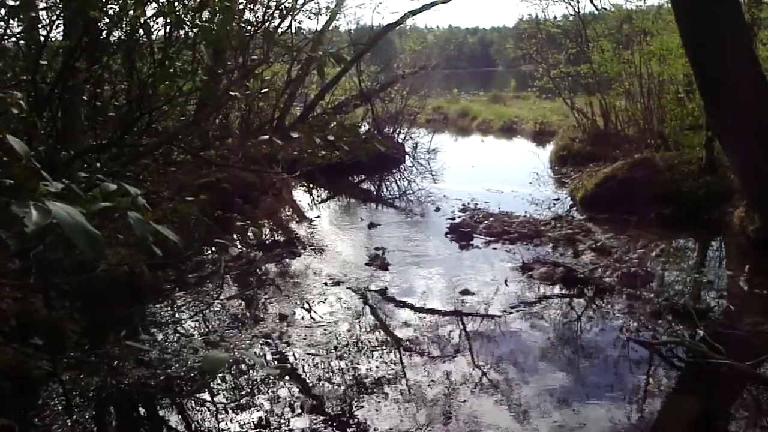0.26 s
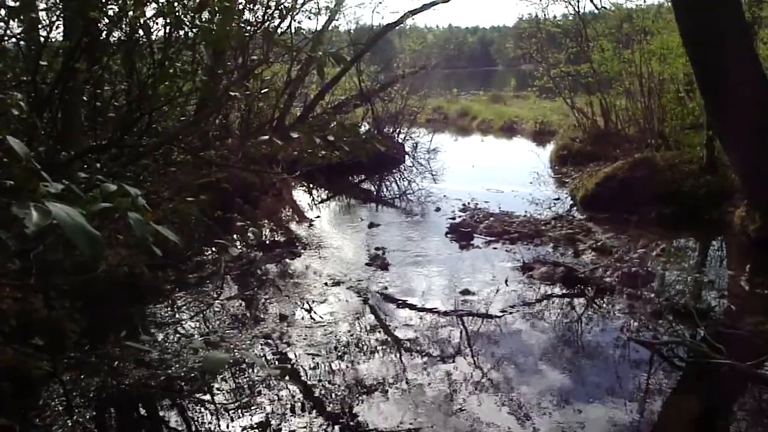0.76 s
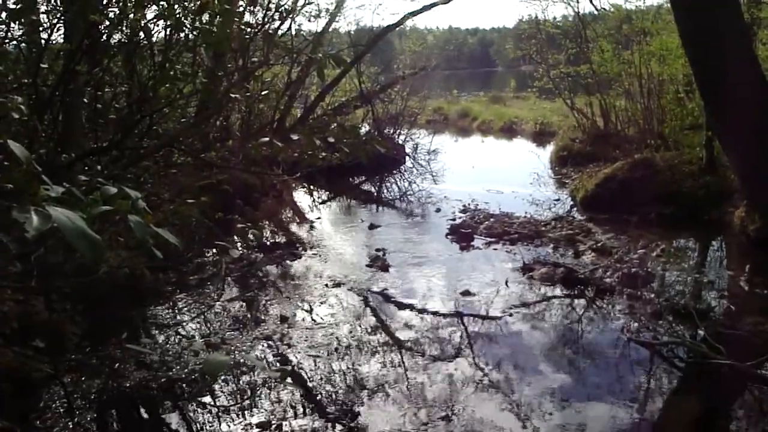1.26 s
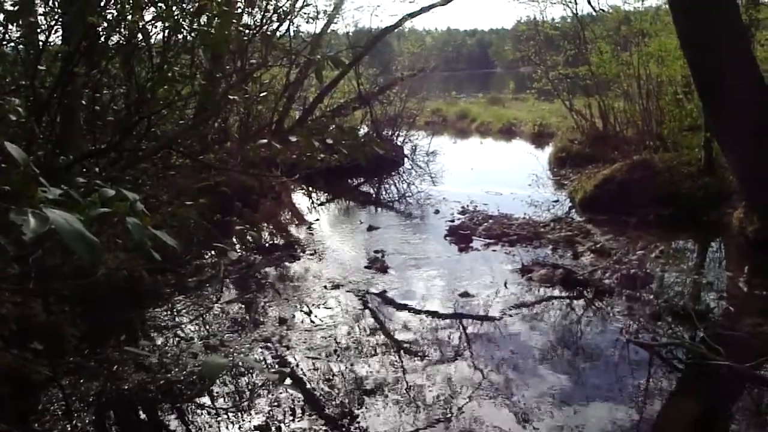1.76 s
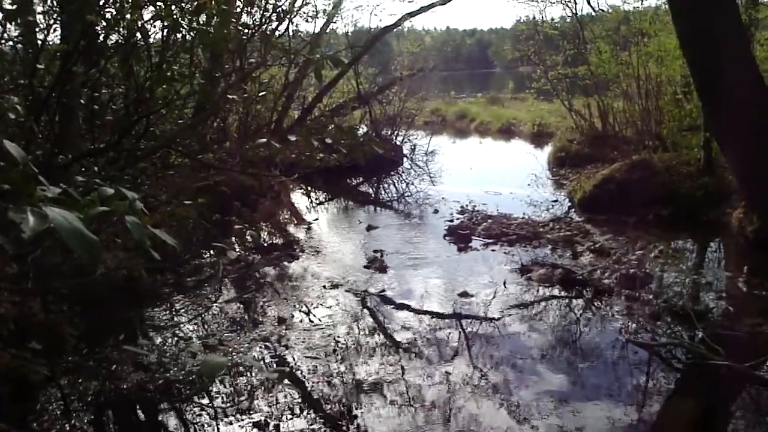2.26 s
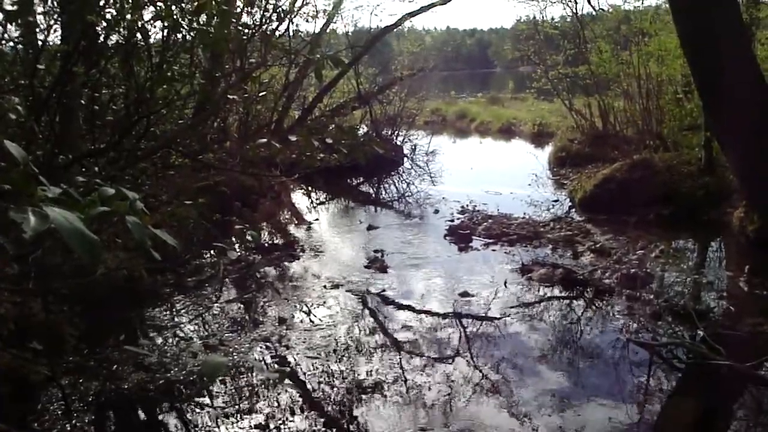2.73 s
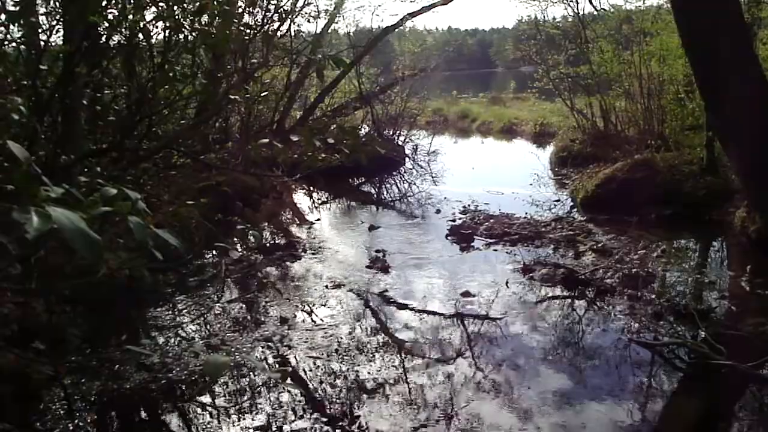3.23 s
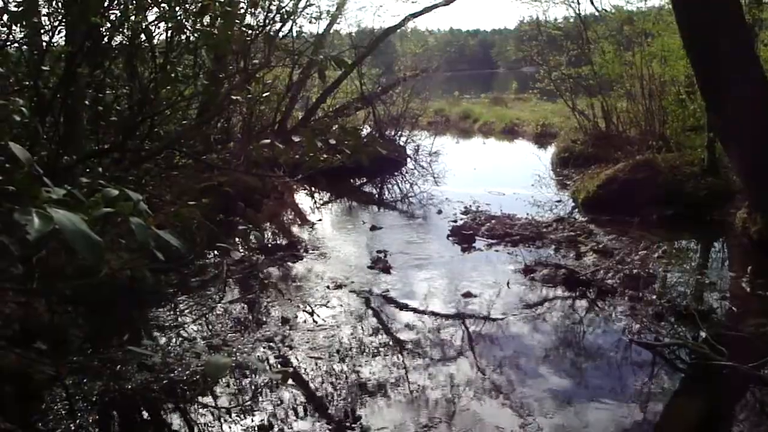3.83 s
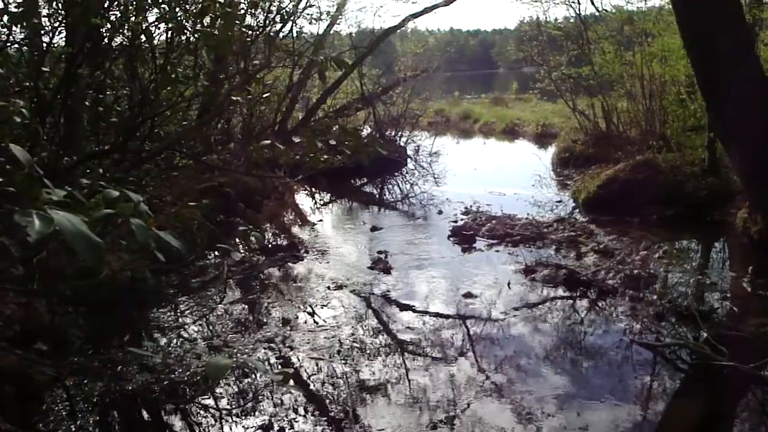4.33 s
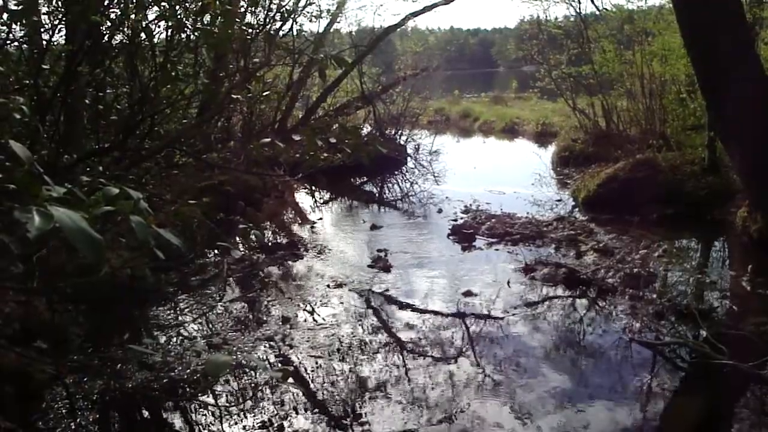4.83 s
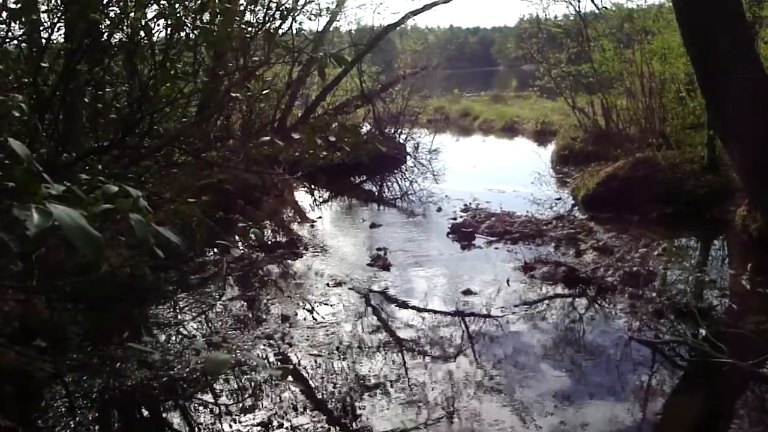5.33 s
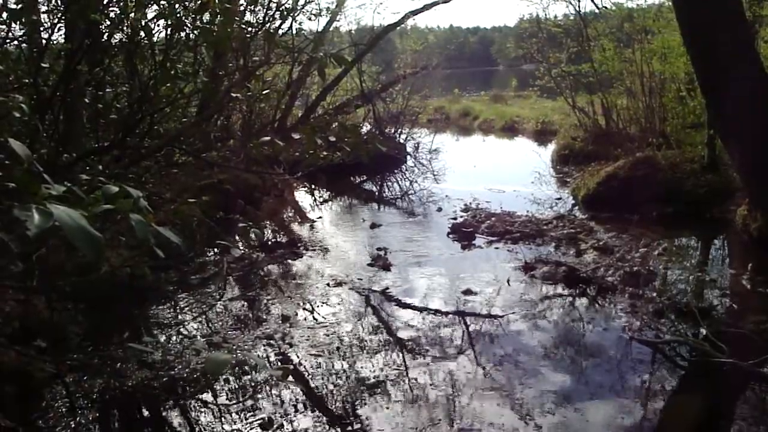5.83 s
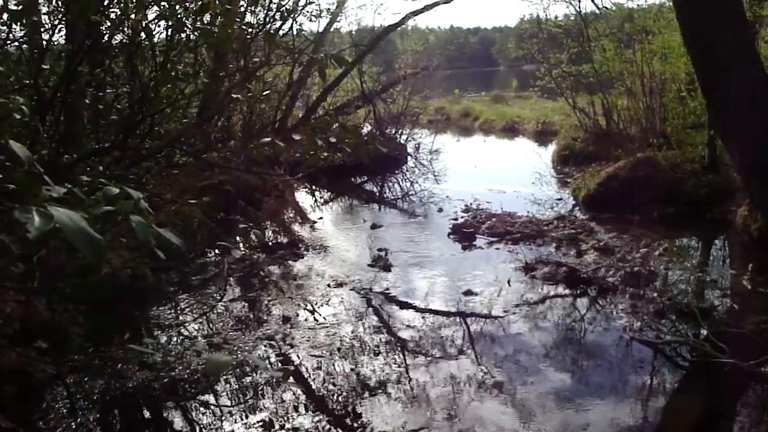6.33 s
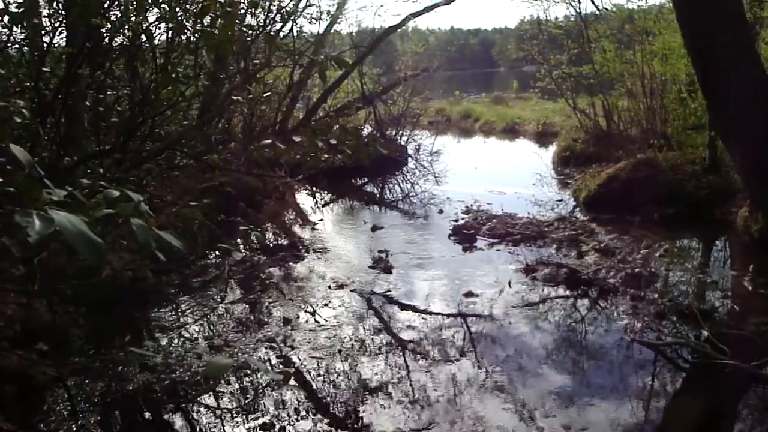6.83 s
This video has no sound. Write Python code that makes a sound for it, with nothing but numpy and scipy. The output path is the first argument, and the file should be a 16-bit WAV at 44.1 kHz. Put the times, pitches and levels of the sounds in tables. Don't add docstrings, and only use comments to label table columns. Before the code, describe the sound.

Steady overlapping toad trills by a pond, with soft breeze and hiss, rapid faint mechanical ticking, and thin bird calls across the water.

```python
import sys
import numpy as np
from scipy import signal
from scipy.fft import rfft, irfft
from scipy.io import wavfile
from scipy.ndimage import uniform_filter1d

SR = 44100
rng = np.random.default_rng(int(sys.argv[2]) if len(sys.argv) > 2 else 0)


def nominal_scale(level):
    x = np.asarray(level, float) / 20
    return 10 ** x


def generate_wav(signal):
    frames = np.transpose(np.atleast_2d(signal))
    scaled = np.clip(frames, -1, 1) * 32767
    pcm = np.round(scaled).astype(np.int16)
    wavfile.write(sys.argv[1], SR, pcm)


N = 312669
T = np.arange(N) / SR


def unit(x):
    return x / np.sqrt(np.mean(x ** 2))


def walk(rate):
    hold = int(SR / rate)
    levels = np.repeat(rng.standard_normal(N // hold + 1), hold)
    slewed = uniform_filter1d(uniform_filter1d(levels, hold), hold)
    return unit(slewed[:N])


def turns(hz):
    return np.cumsum(hz) / SR


def coloured(hz, db):
    log_hz = np.log(np.arange(1, N // 2 + 2) * SR / N)
    return irfft(rfft(rng.standard_normal(N)) * nominal_scale(np.interp(log_hz, np.log(hz), db)), N)


def wood(x, wet_db, t60, stir):
    gap_s = 0.008
    t = T[:SR]
    tail = rng.standard_normal(SR) * np.exp(-np.log(1000) * t / t60) * (t > gap_s)
    scatter = signal.fftconvolve(x * walk(stir), tail / np.linalg.norm(tail))[:N]
    return x + nominal_scale(wet_db) * scatter


def background():
    # (frequency [Hz], level [dB per Hz])
    air = np.array([(45, -20), (65, -3.5), (108, 0), (254, -1), (416, -1), (1080, -6), (1300, -6.5)])
    # (frequency [Hz], level [dB per Hz])
    hiss = np.array([(2050, -0.5), (3000, -3), (3420, -3), (8000, -9.5), (8700, -9), (10700, -12)])
    split_hz = 1700
    low = coloured([15, *air[:, 0], split_hz, split_hz + 1], [-30, *air[:, 1], air[-1, 1], -90])
    high = coloured([split_hz, split_hz + 1, *hiss[:, 0]], [-90, hiss[0, 1], *hiss[:, 1]])
    air_db = -55 + 0.5 * walk(2.83)
    hiss_db = -57.5 + 0.3 * walk(6)
    return nominal_scale(air_db) * unit(low) + nominal_scale(hiss_db) * unit(high)


def toad(hz, rate, tune_hz, sweep_hz, duty):
    rate_drift, slip_turns, wobble_hz = 0.026, 0.16, 5.5
    octave_db, fade_db, attack = -29.5, 0.5, 0.7
    count = turns(rate * (1 + rate_drift * walk(2.5))) + rng.random()
    opening = np.clip(count % 1 / np.clip(duty, 0.2, 1), 0, 1)
    slip = np.cumsum(slip_turns * rng.standard_normal(400))[count.astype(int)]
    bend = duty / rate * (tune_hz * opening + sweep_hz * (opening ** 2 - opening))
    phase = 2 * np.pi * (turns(hz + wobble_hz * walk(5)) + bend + slip)
    tone = np.sin(phase) + nominal_scale(octave_db) * np.sin(2 * phase)
    pulses = np.sin(np.pi * opening ** attack) ** 1.2
    return unit(pulses * tone) * nominal_scale(fade_db * walk(3.89))


def chorus():
    # (group, tone [Hz], pulse rate [1/s])
    toads = [(0, 1518, 39.0), (0, 1470, 26.0), (1, 1578, 33.0), (1, 1640, 26.9), (1, 1666, 38.0),
             (1, 1612, 24.0), (1, 1722, 27.0), (2, 1838, 38.5), (2, 1772, 26.0), (2, 1876, 36.0),
             (2, 1922, 31.0)]
    # (share [dB], sac tuning above the tone [Hz], upward sweep in a pulse [Hz],
    # open part of the cycle [0-1])
    styles = [(0, -16, 30, .8), (-6, -10, 30, .75), (-7, -3, 30, .8), (-1, -2, 30, .7), (0, 12, 30, .75),
              (-4, -4, 30, .8), (-8, -6, 20, .85), (0, -3, 50, .72), (-.5, 8, 20, .85), (-4, -3, 10, .9),
              (-12, 0, 30, .75)]
    # (level [dB], main callers stop [s], level of those left [dB])
    group_levels = [
        (-52.5, 5.05, -79),
        (-47.5, 5.6, -57),
        (-50, 7.1, -50.5),
    ]
    # (time [s], gain [dB])
    swells = [(.09, 0), (.45, 2), (.85, 0.5), (1.48, 3.5), (1.65, 5), (3.4, 2.5), (3.95, 3), (4.6, 4.5),
              (4.96, 3.5), (5.31, 2.5), (5.5, 1.5)]
    stop_fade_s, swell_s = 0.084, 0.027

    groups = np.zeros((3, N))
    for (group, hz, rate), (db, tune_hz, sweep_hz, duty) in zip(toads, styles):
        groups[group] += nominal_scale(db) * toad(hz, rate, tune_hz, sweep_hz, duty)
    out = 0
    for voices, (db, stop_s, left_db) in zip(groups, group_levels):
        heard = wood(voices, wet_db=-4, t60=1, stir=6)
        steady = heard / np.sqrt(uniform_filter1d(heard ** 2, size=SR // 3) + 1e-3)
        out = out + steady * nominal_scale(np.interp(T, [stop_s, stop_s + stop_fade_s], [db, left_db]))
    swell_db = sum(db * np.clip(1 - abs(T - s) / swell_s, 0, 1) for s, db in swells)
    return out * nominal_scale(swell_db)


def lens():
    # (frequency [Hz], ring T60 [s], share in a big step [dB])
    housing = [(4450, .008, -10), (5660, .012, -3), (5850, .011, -1), (6150, .009, 0), (6700, .006, -4),
               (7300, .007, -7), (8720, .014, -14), (9400, .012, -17)]
    tick_colour_db = [-8, -12, -3.5, -15, 2, -3, -5.5, -8.5]
    # (time [s], peak level [dB])
    motor_steps = [(0.4329, -41), (0.5162, -51), (0.5661, -40.5), (0.5995, -39), (0.6325, -42),
                   (1.3673, -45), (1.5165, -48), (1.5339, -47), (1.5675, -38.5), (2.1011, -43),
                   (2.1345, -54), (2.2677, -39), (2.3015, -40), (2.335, -37.5), (2.4843, -41),
                   (2.5017, -45), (4.337, -38.5)]
    field_hz, first_field_s = 59.94, 0.0159
    fade_from_s, fade_db_per_s = 4.4, 16

    ticks, steps = np.zeros((2, N))
    at = np.arange(first_field_s, N / SR - 0.01, 1 / field_hz)
    fade_db = fade_db_per_s * np.maximum(at - fade_from_s, 0)
    ticks[(at * SR).astype(int)] = nominal_scale(-54.5 - fade_db + 2.1 * rng.standard_normal(len(at)))
    for s, db in motor_steps:
        steps[int(s * SR)] = nominal_scale(db - 4.5)
    hz, t60, step_db = np.transpose(housing)
    t = T[:SR // 20, None]
    onset = 1 - np.exp(-t / 0.00042)
    rings = onset * np.exp(-np.log(1000) * t / t60) * np.sin(2 * np.pi * hz * t)
    field_ticks = signal.oaconvolve(ticks, rings @ nominal_scale(tick_colour_db))
    big_steps = signal.oaconvolve(steps, rings @ nominal_scale(step_db))
    return (field_ticks + big_steps)[:N]


def whistles(songs):
    edge_s, flutter_db = 0.008, 1.2
    out = np.zeros(N)
    for s, hz, db in map(np.transpose, songs):
        span = slice(int(s[0] * SR), int(s[-1] * SR))
        t = T[span]
        edge = np.clip(np.minimum(t - s[0], s[-1] - t) / edge_s, 0, 1)
        out[span] += edge * nominal_scale(np.interp(t, s, db)) * np.sin(2 * np.pi * turns(np.interp(t, s, hz)))
    return np.sqrt(2) * out * nominal_scale(flutter_db * walk(45))


def two_voices(start, length, slide_hz, upper_db, lower_db):
    start_hz, slide_s, fall_to_hook_hz = 3715, 0.062, 480
    hook_at_s, hook_hz_per_s = 0.285, 9000
    beak_hz, beak_width_hz, beak_db = 3380, 42, 8.5
    lower_ratio, lower_floor_hz, lower_onset_db = 0.75, 2545, 4

    t = T[:int(length * SR)]
    slide = slide_hz * (1 - np.exp(-t / slide_s))
    sag = (fall_to_hook_hz - slide_hz) * t / hook_at_s
    hz = start_hz - slide - sag
    hook_hz = hook_hz_per_s * np.maximum(t - hook_at_s, 0)
    db = upper_db + beak_db * np.exp(-((hz - beak_hz) / beak_width_hz) ** 2)
    upper = np.transpose([start + t, hz - hook_hz, db])
    low_hz = np.maximum(lower_ratio * hz, lower_floor_hz)
    lower = np.transpose([start + t, low_hz, lower_db + lower_onset_db * np.exp(-t / slide_s)])
    return [upper, lower[hook_hz == 0]]


def buzz(start, length, first_hz, last_hz, db):
    slur_rate, scatter_hz, rough_db = 170, 240, 2.2
    edge_s, fade_s = 0.03, 0.097
    count = turns(slur_rate * (1 + 0.28 * np.tanh(walk(50))))
    cycle = count % 1
    pitch_chance, strength_chance = rng.standard_normal((2000, 2))[count.astype(int)].T
    path_hz = np.interp(T, [start, start + length], [first_hz, last_hz])
    pitch = path_hz + scatter_hz * (pitch_chance + 1 - 2 * cycle)
    edge = np.clip(np.minimum((T - start) / edge_s, (start + length - T) / fade_s), 0, 1)
    slur = np.sin(np.pi * cycle) * nominal_scale(rough_db * strength_chance) * np.sin(2 * np.pi * turns(pitch))
    return unit(slur) * edge * nominal_scale(db)


def birds():
    # (start [s], length [s], first pitch [Hz], last pitch [Hz], level [dB])
    short_notes = [(1.027, .022, 5760, 5760, -66), (1.052, 0.022, 5760, 5760, -62),
                   (1.26, .08, 3350, 3350, -69), (1.98, 0.098, 4250, 4130, -69),
                   (2.071, 0.056, 4120, 4100, -63), (2.346, .055, 5750, 5720, -66),
                   (2.36, 0.052, 6720, 6720, -70), (2.55, 0.038, 4200, 4020, -64),
                   (2.59, .035, 4300, 4100, -67), (2.735, .04, 6380, 6400, -64),
                   (2.772, .045, 5900, 5900, -69), (4.328, .02, 4420, 4400, -64),
                   (4.345, .055, 4200, 4180, -70), (4.52, .07, 2500, 2510, -71),
                   (5.223, .11, 3890, 3900, -65), (5.48, 0.13, 2380, 2480, -61.5),
                   (5.541, 0.17, 3400, 3350, -70)]
    # (start [s], length [s], opening slide [Hz], upper voice [dB], lower voice [dB])
    falling = [
        (1.068, .11, 420, -66.5, -90),
        (2.08, .2, 370, -71, -90),
        (4.095, .315, 215, -61.5, -67),
        (5.113, .325, 215, -61.5, -68),
        (5.745, .2, 365, -64, -80),
    ]
    # (start [s], length [s], first pitch [Hz], last pitch [Hz], level [dB])
    phrases = [
        (2.18, .37, 5200, 5800, -67.5),
        (2.45, .2, 5800, 5550, -63),
        (2.58, .44, 5700, 6650, -64.5),
        (2.39, .15, 5200, 4100, -64),
        (2.5, .16, 5200, 4100, -64),
        (2.6, .3, 5300, 5750, -67),
    ]
    stir = 260
    notes = [[(s, a, db), (s + length, b, db)] for s, length, a, b, db in short_notes]
    calls = [voice for row in falling for voice in two_voices(*row)]
    across_water = wood(whistles(calls + notes), wet_db=-7.5, t60=1.5, stir=stir)
    deep_in_wood = wood(sum(buzz(*row) for row in phrases), wet_db=3, t60=0.6, stir=stir)
    return across_water + deep_in_wood * nominal_scale(-3.5)


def scene():
    return (background() + chorus() + lens() + birds())[None]


def roll_off(x):
    return signal.sosfilt(signal.butter(12, 13460, fs=SR, output="sos"), x)


def record(dry):
    hz = np.arange(N // 2 + 1) * SR / N
    cut = irfft(rfft(dry) * (hz < SR / 4 - 10), N)
    high_band = unit(coloured([12990, 13020, 13450, 13480], [-70, 0, -12, -70]))
    return roll_off(cut + high_band * nominal_scale(-105 + 2.5 * walk(60)))


dry = scene()
out = record(dry)
generate_wav(out)
```